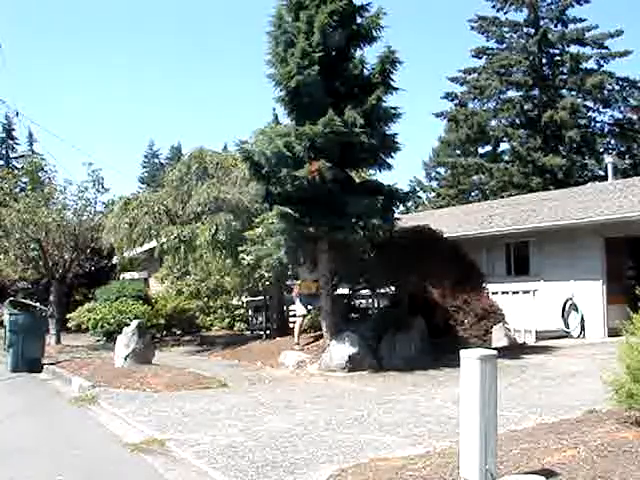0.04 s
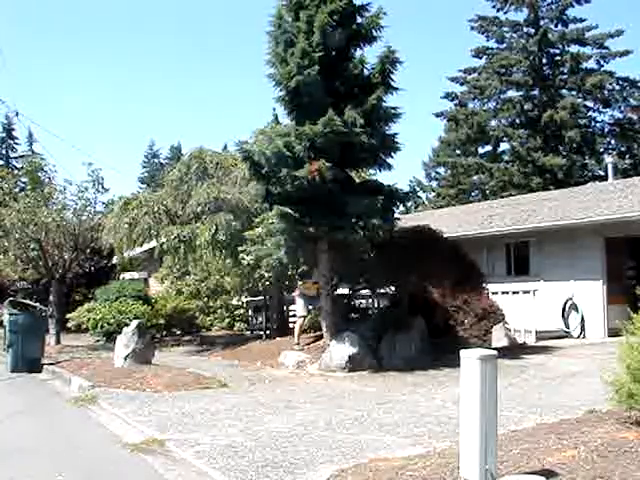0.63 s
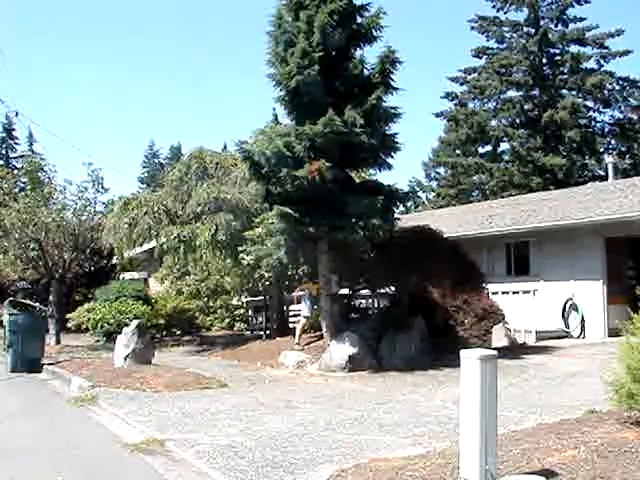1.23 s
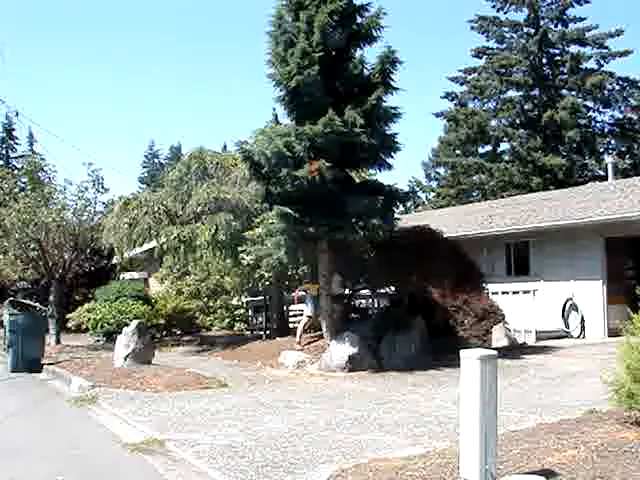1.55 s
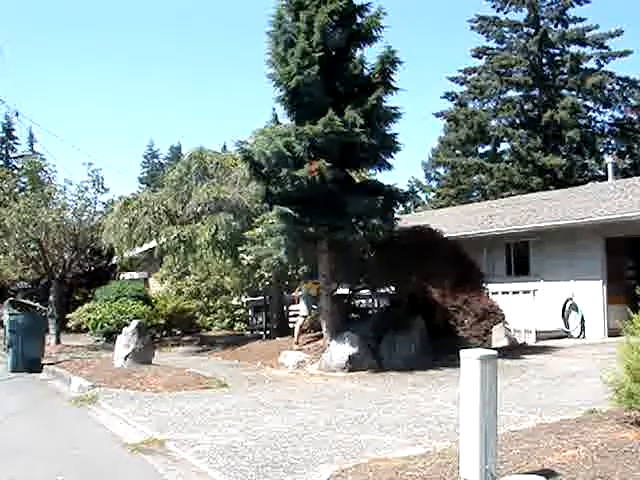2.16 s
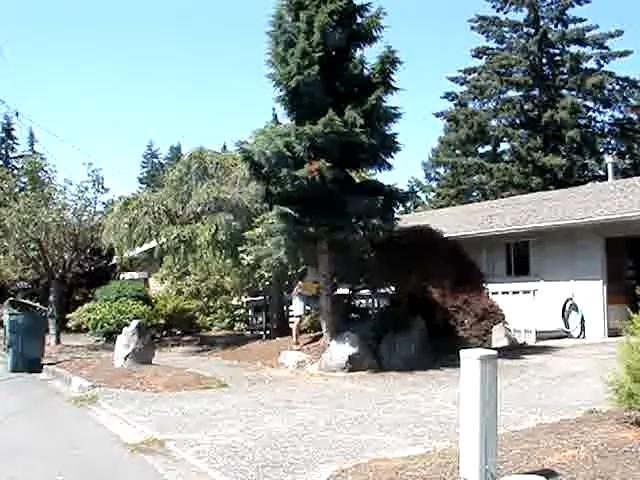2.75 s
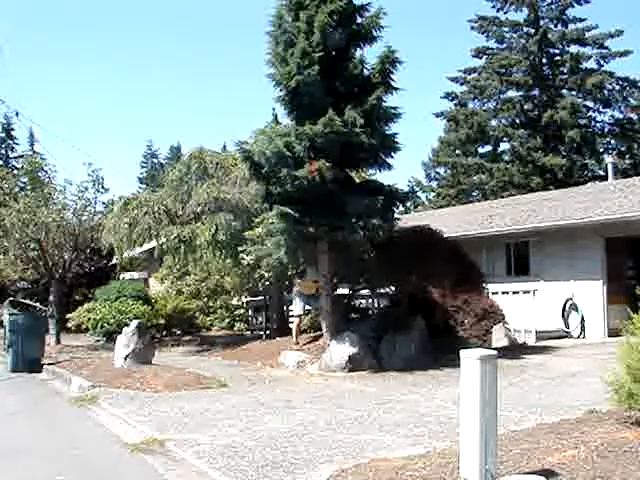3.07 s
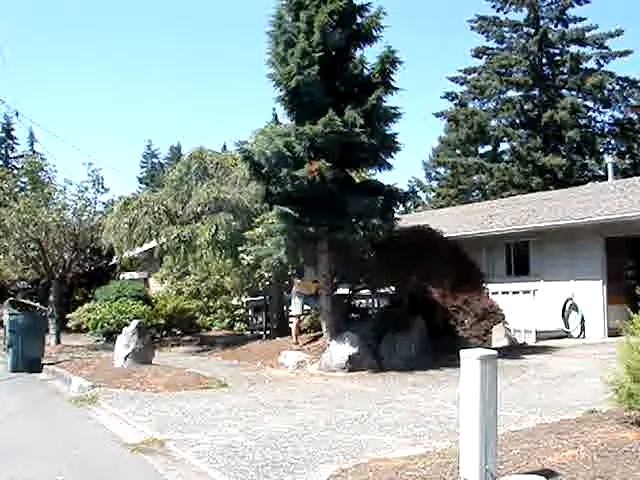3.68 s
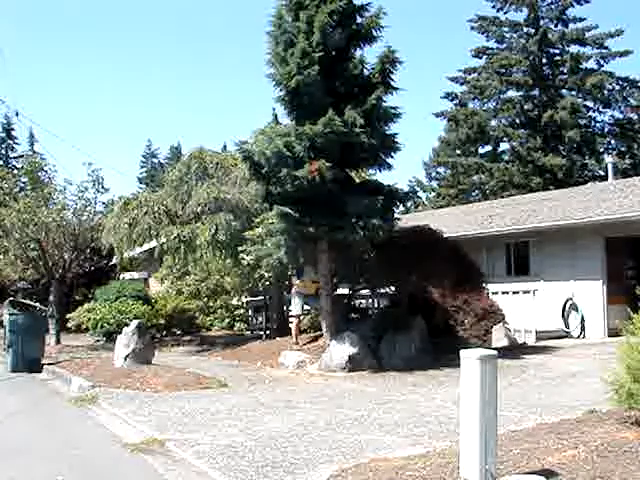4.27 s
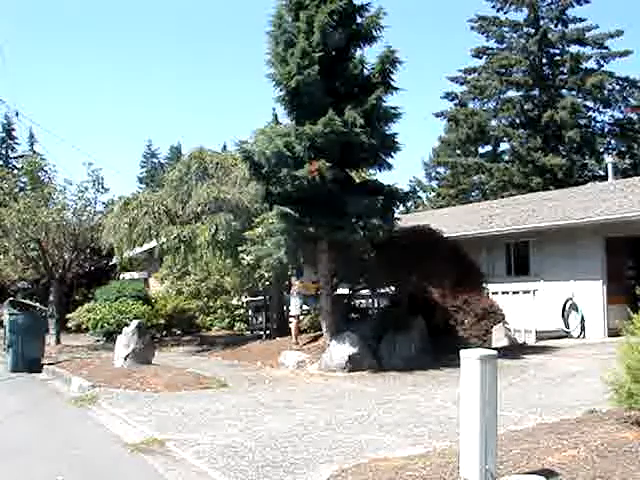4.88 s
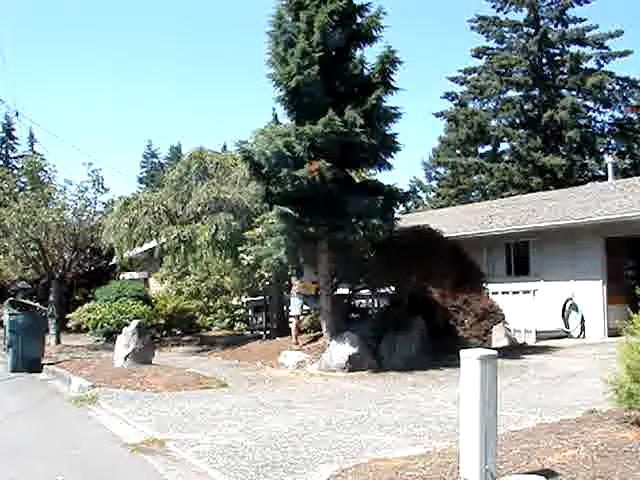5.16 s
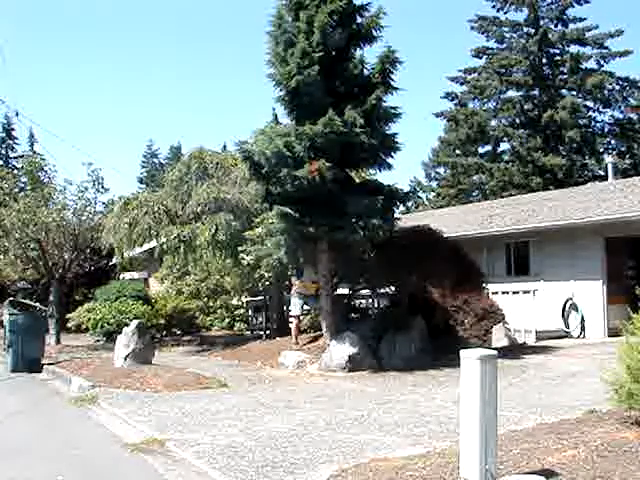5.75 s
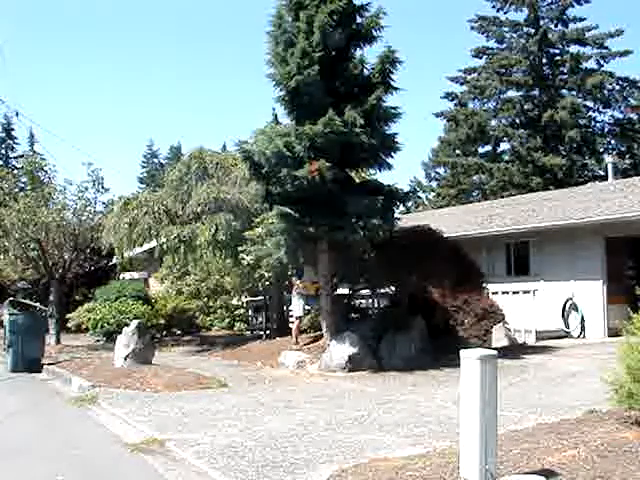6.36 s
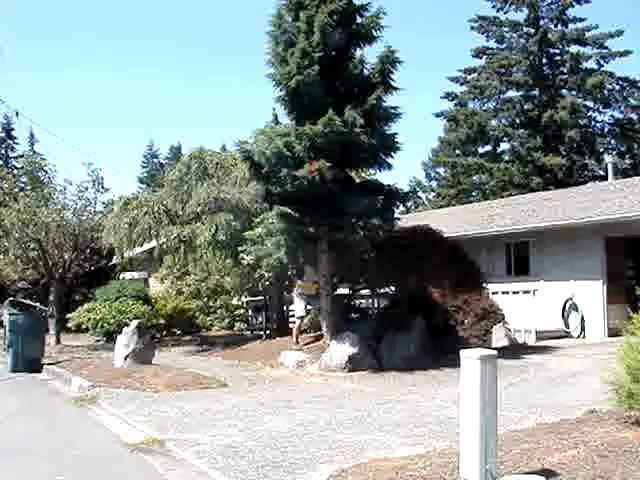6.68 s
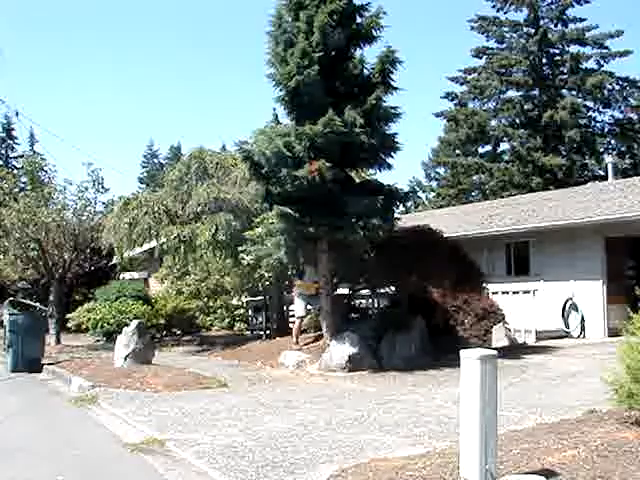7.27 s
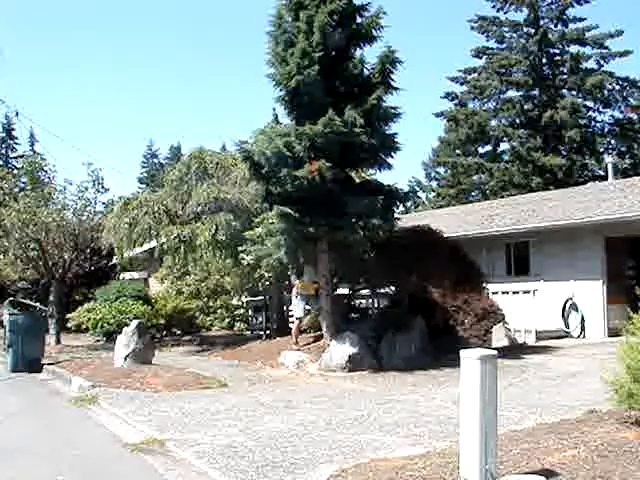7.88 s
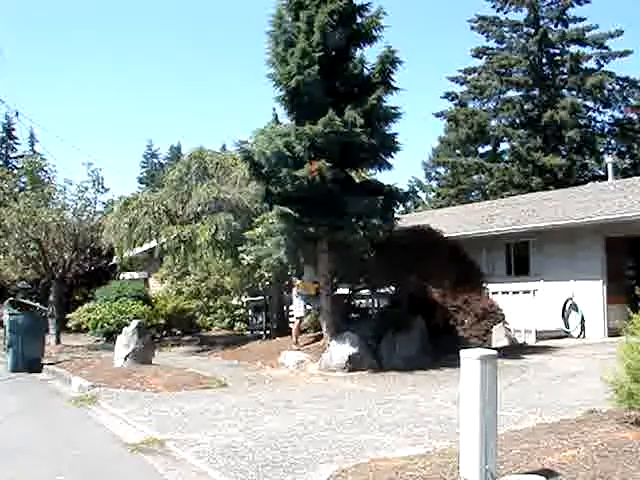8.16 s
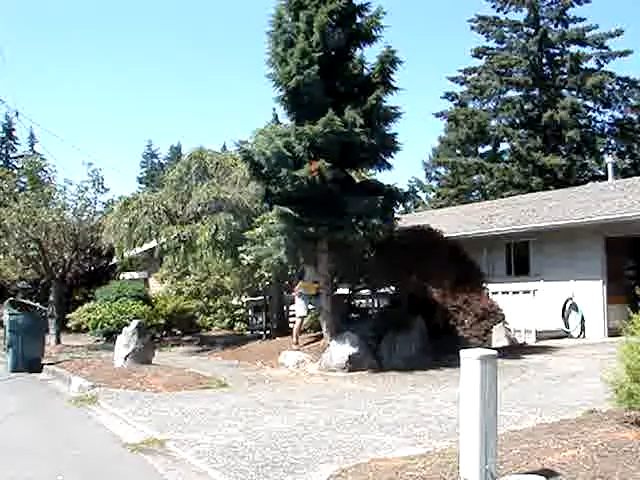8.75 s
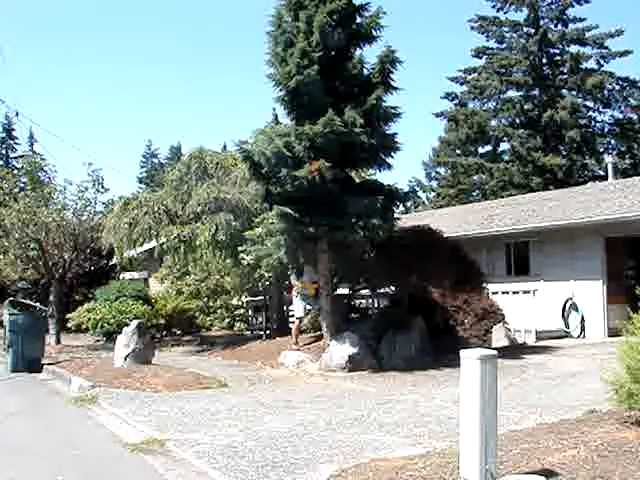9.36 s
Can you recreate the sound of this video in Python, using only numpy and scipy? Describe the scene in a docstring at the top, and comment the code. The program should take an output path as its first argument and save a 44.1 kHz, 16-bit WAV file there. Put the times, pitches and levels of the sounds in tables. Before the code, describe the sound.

Outdoors among houses and trees, a songbird whistles about once a second and a crow gives two hoarse caws over steady, far traffic. A faint siren wail and a distant horn pass through. Then an electric chainsaw suddenly spins up and dominates to the end, with a high, wavering whine and a clattering, rasping chain. The yard adds a light echo, and soft thumps bump the microphone.

```python
"""Soft traffic washes over a suburban yard. A small bird repeats a rising whistle, a crow caws twice,
twigs tick, and a far siren, horn and engine hums ride on the wash. Then an electric chainsaw starts:
its motor whines and sags under load, the chain clatters on the bar and rasps in the wood.
House and trees throw back the saw and the birds; faint gusts and low thumps touch the microphone."""
import sys
import numpy as np
from scipy import signal
from scipy.fft import rfft, irfft, next_fast_len
from scipy.io import wavfile
from scipy.ndimage import uniform_filter1d

SR = 44100
rng = np.random.default_rng(int(sys.argv[2]) if len(sys.argv) > 2 else 0)


def to_wav(s):
    """Save 16-bit WAV."""
    ch = np.atleast_2d(s).T  # columns
    pcm = np.round(np.clip(ch, -1, 1) * 32767)  # PCM
    wavfile.write(sys.argv[1], SR, pcm.astype(np.int16))


N = 415422
TIME = np.arange(N) / SR
FFT_SIZE = 2 * next_fast_len(N // 2 + 1)
FREQS = np.fft.rfftfreq(FFT_SIZE, 1 / SR)

# tone colour of the traffic: frequency_hz, gain_db
TRAFFIC_COLOUR = [(25, -22), (45, -12), (75, -2), (152, -5.5), (300, -2), (365, -2.5), (482, -5.5),
                  (780, -6.5), (900, -8), (1280, -13), (1730, -17), (3000, -25.5), (7040, -32.5),
                  (10000, -36.5)]
# gusts on the microphone: centre_s, half_width_s, level_db
GUSTS = [(1.25, 0.22, -59), (2.15, .3, -65)]
# low thumps on the microphone: centre_s, level_db
THUMPS = [(6.556, -29.5), (6.622, -37), (6.653, -28), (6.69, -34), (6.717, -25), (6.735, -33), (6.845, -30),
          (7.606, -30.5), (7.792, -34), (7.853, -34), (7.888, -36), (7.96, -38), (8.56, -37)]
# hum of a far engine: time_s, pitch_hz, level_db
ENGINE_HUM = [(0, 300.7, -58), (1.05, 299, -60), (1.38, 323.4, -55), (1.7, 325.7, -58), (3.45, 334, -62.5),
              (3.7, 347.6, -50), (4.2, 356, -56.5), (5.3, 367, -54), (5.9, 367, -56)]
# deeper hum of a second engine: time_s, pitch_hz, level_db
LOW_ENGINE_HUM = [(4.35, 197, -64), (4.55, 211.3, -53), (4.8, 223.6, -55), (4.95, 215, -68),
                  (5.4, 200.6, -56), (5.9, 232.4, -57)]
# one slow siren wail: time_s, pitch_hz, level_db
SIREN_WAIL = [(2.8, 1593, -63), (3.85, 1030, -62.5), (4.05, 964, -51), (4.2, 898, -60), (4.55, 778, -54),
              (4.85, 939, -63), (5.15, 1153, -62), (5.45, 1317, -61), (5.67, 1437, -60), (5.85, 1500, -72)]
# tones of the far horn: pitch_hz, base_level_db
HORN_CHORD = [(619, -54), (711, -55), (787, -53.5), (824, -55), (991, -57.5), (1446, -65.5)]
# the horn's swell: time_s, gain_db
HORN_SWELL = [(4.38, -24), (4.5, -2), (4.8, -1.5), (5.02, 3.5), (5.25, -3.5), (5.55, -0.5), (5.75, -9)]
# ticks and twig snaps: start_s, level_db, band_hz, decay_s
TICKS = [(.16, -49, 2500, .004), (2.196, -49, 5000, 0.0056), (2.511, -44.5, 1490, .005),
         (2.62, -55, 3504, 0.0046), (2.926, -42, 9000, 0.0043), (4.65, -51, 6010, 0.0037)]
# contour of one whistle: length_fraction, pitch_hz, gain_db
WHISTLE_CONTOUR = [(0, 3620, -15), (.04, 3560, -10), (.23, 3320, -8.5), (.45, 3420, -7.5),
                   (.62, 3580, -4.5), (.76, 3970, -4), (.86, 4270, 1), (.94, 4110, -2.5), (.975, 4076, -2),
                   (1, 4175, -25)]
# the bird's whistles: start_s, length_s, pitch_ratio, level_db, flick_amount
WHISTLES = [(-.18, .22, 0.97, -49.5, 0), (0.248, 0.22, 0.99, -45, 0.04), (1.047, 0.21, 1, -50, .1),
            (2.787, 0.2, 0.99, -47.5, 0), (3.633, .214, 1.003, -43.5, 0), (4.737, .218, 0.99, -47.5, 0.85),
            (5.558, 0.21, .97, -47.5, 1)]
# resonances of the crow's throat: frequency_hz, gain_db
CROW_THROAT = [(300, -34), (1100, -7), (1370, -32), (1490, 5), (1750, 3.5), (2060, 4), (2230, -8),
               (2750, -21), (3050, -15), (3400, -26.5), (4000, -10), (4400, -10.5), (4700, -31),
               (5050, -12.5), (6000, -25), (9000, -36)]
# caws: start_s, length_s, top_pitch_hz, level_db, swell_db, midway_treble_db, beak_shift_ratio
CAWS = [(0.352, .35, 296.7, -47.5, 5.5, 1, 0.95), (1.599, .345, 283, -39, -1.5, 3, 0.96)]
# motor speed, sagging twice as the chain is pressed into the wood: time_s, whine_hz
MOTOR_SPEED = [(5.88, 999), (5.95, 2098), (6.02, 2552), (6.08, 2988), (6.24, 3490), (6.41, 3612),
               (6.62, 3475), (6.79, 3228), (7.03, 3046), (7.3, 3133), (7.65, 3416), (7.79, 3633),
               (7.89, 3713), (8.04, 3130), (8.28, 2814), (8.56, 2745), (8.68, 2615), (8.78, 2798),
               (8.84, 2987), (8.97, 3098), (9.13, 3317), (9.28, 3378), (9.42, 3540)]
# the housing favours some pitches of the whine: whine_hz, gain_db
WHINE_COLOUR = [(1000, -21), (2100, 2), (2500, 11.5), (2620, 0.5), (2740, 4), (2900, -3), (3060, 1.5),
                (3200, -3), (3400, 6.5), (3500, -1.5), (3700, 2.5)]
# rough lines of the rotor: shaft_multiple, gain_db, width_hz
ROTOR_LINES = [(1, -27.5, 27), (3.5, -12, 60), (4.5, -16.5, 60), (7.5, -15.5, 120), (10.1, -8, 65),
               (11.067, -6.5, 26), (12.88, -6.5, 70), (15.04, -15.5, 60), (23.9, -15.5, 400),
               (35.7, -19, 270)]
# the housing's lift on a passing rotor line: frequency_hz, gain_db
ROTOR_COLOUR = [(230, -5), (290, 4.5), (600, -2), (2500, 0), (2900, -2.5), (3150, -8), (3420, 11.5),
                (3700, -5.5), (4900, 6.5), (5250, 7.5), (5550, -3), (5850, 10), (6250, 6), (6550, -8),
                (7700, -7), (8350, 4), (9000, -6)]
# clatter bands that follow the speed: whine_multiple, width_hz, gain_db
CLATTER_BANDS = [(1.0, 140, -12), (1.0, 750, 0), (2.0, 1100, -10.5)]
# tone colour of the cutters' rasp: frequency_hz, gain_db
RASP_COLOUR = [(60, -41), (180, -25.5), (290, -16), (430, -5), (700, 0), (1150, 5), (1600, -3.5),
               (2600, -0.5), (3500, 4), (4100, -1), (6200, -4), (7200, -11.5), (10000, -19)]
# shared level of rasp, clatter, rotor and housing; rises at spin-up, then nearly steady: time_s, gain_db
CUTTING_FADER = [(5.88, -43), (6.0, -31.5), (6.45, -28.5), (6.65, -28.5), (7.0, -30), (7.85, -29.5),
                 (8.02, -31), (8.62, -30.5), (8.85, -31), (9.42, -31)]
# resonances of the housing: frequency_hz, width_hz, gain_db
HOUSING_MODES = [(1982, 255, 0), (2220, 270, -2.5), (3355, 210, 3), (5980, 320, -15)]
# resonances of the bar: frequency_hz, width_hz, gain_db
BAR_MODES = [(301, 49, -9.5), (941.5, 64, 2.5), (878, 62, -3), (1185, 74, -12)]
# the chain slaps the bar: centre_s, boost_db
CHAIN_SLAPS = [(6.03, 8.5), (6.65, 6), (6.79, 3.5), (7.28, 4.5), (7.77, 3.5), (9.26, 2.5)]

SAW_ON_S, ARMATURE_SLOTS, CRUISE_WHINE_HZ = 5.878, 12, 3420


def undb(db):
    """Decibels to gain."""
    return 10 ** (np.asarray(db) / 20)


def unit(x):
    """Scale to rms 1."""
    return x / np.sqrt(np.mean(np.abs(x) ** 2))


def curves(rows):
    """Each column of a table, joined by straight lines in time."""
    times, *columns = np.transpose(rows)
    return [np.interp(TIME, times, column) for column in columns]


def during(rows):
    """1 while a table lasts, else 0."""
    return (TIME >= rows[0][0]) & (TIME <= rows[-1][0])


def swell(centre_s, half_width_s):
    """A bell-shaped bump of height 1."""
    return np.exp(-((TIME - centre_s) / half_width_s) ** 2)


def colour(points, hz):
    """Gain of an EQ curve at the given frequencies."""
    points_hz, db = np.transpose(points)
    return undb(np.interp(np.log(hz + 1), np.log(points_hz), db))


def ring(modes):
    """Frequency response of a set of resonances."""
    return sum(undb(db) * 1j * FREQS * width / (hz ** 2 - FREQS ** 2 + 1j * FREQS * width)
               for hz, width, db in modes)


def shape(x, response):
    """Filter by a frequency response; rms 1."""
    return unit(irfft(rfft(x, FFT_SIZE) * response)[:N])


def noise():
    """White noise."""
    return rng.standard_normal(N)


def walk(rate):
    """Random drift through rate points a second; spread 1."""
    knots = rng.standard_normal(N // 32)
    return np.sqrt(3 / 2) * np.interp(TIME * rate, np.arange(len(knots)), knots)


def blurred(phase, width_hz):
    """A tone smeared into a band by drifting level and phase."""
    return walk(width_hz) * np.cos(phase) + walk(width_hz) * np.sin(phase)


def phase_of(hz):
    """Running phase of a moving pitch."""
    return 2 * np.pi * np.cumsum(hz) / SR


def yard_reverb(x, wet_db, t60_s):
    """Direct sound plus duller, scattered returns from house and trees."""
    t = TIME[:SR]
    tail = rng.standard_normal(SR) * np.exp(-np.log(1000) * t / t60_s) * np.clip(t / 0.02, 0, 1)
    tail = signal.sosfilt(signal.butter(1, 4500, fs=SR, output="sos"), tail)
    return x + undb(wet_db) * signal.fftconvolve(x, tail / np.linalg.norm(tail))[:N]


def traffic():
    """The town's wash: rumble and tyre noise waver separately and slowly grow over a steady hiss."""
    start_db, rise_db_per_s, hiss_db = -47.5, 0.31, -45
    wash = shape(noise(), colour(TRAFFIC_COLOUR, FREQS))
    lows, body = (signal.sosfiltfilt(signal.butter(2, hz, fs=SR, output="sos"), wash)
                  for hz in (200, 2500))
    rumble = lows * undb(2.1 * walk(11))
    tyres = (body - lows) * undb(0.66 * walk(11))
    return undb(start_db + rise_db_per_s * TIME) * (rumble + tyres) + undb(hiss_db) * (wash - body)


def breeze():
    """Dying air and two faint gusts rumble on the microphone."""
    air_db, fall_db_per_s = -73.5, 1.5
    air = undb(air_db - fall_db_per_s * TIME)
    gusts = sum(undb(db) * swell(centre_s, half_s) for centre_s, half_s, db in GUSTS)
    return (air + gusts) * shape(noise(), ring([(38, 30, 0)]) ** 2)


def thumps():
    """Soft pushes of pressure on the microphone, without their steady part."""
    pushes = sum(undb(db) * swell(centre_s, half_width_s=0.0024) for centre_s, db in THUMPS)
    return signal.sosfilt(signal.butter(1, 14, "high", fs=SR, output="sos"), pushes)


def far_vehicle(glide):
    """An engine hum or siren arrives blurred by many paths."""
    hz, db = curves(glide)
    return undb(db) * during(glide) * blurred(phase_of(hz), width_hz=35)


def far_horn():
    """A horn holds its chord and slowly fades in and out, each tone wavering in level."""
    swell_db, = curves(HORN_SWELL)
    chord = sum(undb(db + 2.1 * walk(9)) * np.sqrt(2) * np.sin(2 * np.pi * hz * TIME)
                for hz, db in HORN_CHORD)
    return undb(swell_db - 2.0) * during(HORN_SWELL) * chord


def twig_ticks():
    """Brief dry cracks of noise, each with its own brightness."""
    out = np.zeros(N)
    t = TIME[:SR // 10]
    for start_s, db, hz, decay_s in TICKS:
        band = signal.butter(1, [hz / 2, min(hz * 1.4, SR / 3)], "band", fs=SR, output="sos")
        crack = unit(signal.sosfilt(band, rng.standard_normal(len(t))))
        start = int(start_s * SR)
        out[start:start + len(t)] += undb(db) * crack * np.exp(-t / decay_s)
    return out


def songbird():
    """A nearly pure whistle dips, climbs and ends on a buzzy hook; some open with a loud upward flick."""
    fraction, contour_hz, contour_db = np.transpose(WHISTLE_CONTOUR)
    hz, envelope, buzz = np.zeros((3, N))
    for start_s, length_s, pitch_ratio, db, flick_amount in WHISTLES:
        on = (TIME >= start_s) & (TIME < start_s + length_s)
        progress = (TIME[on] - start_s) / length_s
        flick = flick_amount * np.exp(-((progress - .09) / .06) ** 2)
        hz[on] = pitch_ratio * np.interp(progress, fraction, contour_hz) + 190 * flick
        envelope[on] = undb(db + np.interp(progress, fraction, contour_db) + 8.4 * flick)
        buzz[on] = progress ** 4
    phase = phase_of(hz * (1 + 0.0061 * walk(30) + 0.017 * buzz * walk(600)))
    tone = np.sqrt(2) * (np.sin(phase) + undb(-27) * np.sin(2 * phase))
    return yard_reverb(tone * envelope * undb(1.04 * walk(80)), wet_db=-16.5, t60_s=0.77)


def crow():
    """Jittery pulses through a nasal throat: brightest midway, hoarse as the pitch falls at the end."""
    scoop_depth, scoop_s, end_drop = .08, .04, .18
    attack_s, release_s, release_db = 0.033, .06, -18
    out = np.zeros(N)
    for start_s, length_s, top_hz, db, swell_db, treble_db, beak_shift in CAWS:
        on = (TIME >= start_s) & (TIME < start_s + length_s)
        t = TIME - start_s
        progress = np.clip(t / length_s, 0, 1)
        hz = top_hz * (1 - scoop_depth * np.exp(-t[on] / scoop_s) - end_drop * progress[on] ** 4)
        closing = np.clip((t - length_s) / release_s + 1, 0, 1)
        envelope = np.clip(t / attack_s, 0, 1) * undb(db + swell_db * progress + release_db * closing)
        hoarse = np.clip((270 - hz) / 40, 0, 1)
        phase = phase_of(hz * (1 + (.006 + .006 * hoarse) * walk(300)[on]))
        pulses = unit(sum(np.cos(k * phase) for k in range(1, 32)))
        breath = (.1 + .08 * hoarse) * noise()[on] * (1 + np.cos(phase))
        voice = np.zeros(N)
        voice[on] = pulses + breath
        caw = shape(voice, colour(CROW_THROAT, FREQS / beak_shift)) * np.sqrt(np.mean(on)) * envelope
        treble = signal.sosfiltfilt(signal.butter(4, 2800, "high", fs=SR, output="sos"), caw)
        out += caw + treble * (undb(treble_db - 6.9 * np.cos(np.pi * progress) ** 2) - 1)
    return yard_reverb(out, wet_db=-9, t60_s=0.79)


def braking(hz, window, full_hz_per_s):
    """How fast the motor slows over window samples: 1 in a full bite, negative when running up."""
    return np.clip(-uniform_filter1d(np.gradient(hz), size=window) * SR / full_hz_per_s, -1, 1)


def motor_whine(hz, slot_phase):
    """The slots' tone swells in the housing's resonances and under braking; it thins running free."""
    bite_db, free_db = 6.5, -7.5
    load = braking(hz, window=SR // 16, full_hz_per_s=4100)
    load_db = bite_db * np.maximum(load, 0) ** 2 + free_db * np.maximum(-load, 0)
    housing_db = np.interp(hz, *np.transpose(WHINE_COLOUR))
    flicker_db = 0.6 * walk(9) + 1.3 * walk(60)
    return np.sqrt(2) * np.sin(slot_phase) * undb(-28 + housing_db + load_db + flicker_db)


def rotor_growl(hz, slot_phase):
    """An uneven rotor adds rough lines that swell as they sweep through the housing's resonances."""
    lines = np.zeros(N)
    for multiple, db, width_hz in ROTOR_LINES:
        lift = colour(ROTOR_COLOUR, multiple * hz / ARMATURE_SLOTS)
        nearest_half = np.round(2 * multiple) / 2
        lines += undb(db) * lift * blurred(nearest_half * slot_phase / ARMATURE_SLOTS, width_hz)
    # as the chain bites, the motor slows and the whine's octave flares
    bite = np.maximum(braking(hz, window=SR // 8, full_hz_per_s=1100), 0)
    octave = colour(ROTOR_COLOUR, 2 * hz) * blurred(2 * slot_phase, width_hz=270)
    return lines + undb(-11.5) * bite * octave


def link_impacts(shaft_phase, scatter_db, throb):
    """Chain links strike with random force, harder once per shaft turn and in uneven bites."""
    hits_per_s = 2500
    hits = noise() * (rng.random(N) < hits_per_s / SR)
    return (unit(hits) + 0.7 * noise()) * (1 + throb * np.cos(shaft_phase)) * undb(scatter_db * walk(95))


def bar_rattle(hz, shaft_phase):
    """The chain rattles the bar harder when slack or fast, throbs once a lap and now and then slaps."""
    cruise_db, db_per_hz, floor_db, turns_per_lap = -28, 0.0107, -34.5, 27.1
    # the thin bar radiates little bass, and its dull knocks little treble
    response = ring(BAR_MODES) * FREQS / np.hypot(FREQS, 700) / np.hypot(1, (FREQS / 1600) ** 3)
    knocks = shape(link_impacts(shaft_phase, scatter_db=2.0, throb=0.21), response)
    speed_db = np.maximum(cruise_db + db_per_hz * (hz - CRUISE_WHINE_HZ), floor_db)
    slack_db = 2.5 * np.clip((6.85 - TIME) / .1, 0, 1)  # until the chain settles in the cut
    lap_db = -1.4 * np.cos(shaft_phase / turns_per_lap)
    slap_db = sum(db * swell(centre_s, half_width_s=.028) for centre_s, db in CHAIN_SLAPS)
    return knocks * undb(speed_db + slack_db + lap_db + slap_db)


def chainsaw():
    """Armature slots whine at twelve times the shaft rate; the chain rasps and rings bar and housing."""
    hz, = curves(MOTOR_SPEED)
    cutting_db, = curves(CUTTING_FADER)
    gear_chatter = np.clip((SAW_ON_S + .25 - TIME) / 0.155, 0, 1)  # only during spin-up
    slot_phase = phase_of(hz * (1 + 0.001516 * walk(60) + .06 * gear_chatter * walk(400)))
    shaft_phase = slot_phase / ARMATURE_SLOTS
    whine = motor_whine(hz, slot_phase)
    growl = rotor_growl(hz, slot_phase)
    clatter = sum(undb(db) * blurred(k * slot_phase, width_hz) for k, width_hz, db in CLATTER_BANDS)
    rasp = shape(link_impacts(shaft_phase, scatter_db=0.5, throb=.06), colour(RASP_COLOUR, FREQS))
    housing = shape(link_impacts(shaft_phase, scatter_db=1.0, throb=0.17), ring(HOUSING_MODES))
    cutting = (growl + clatter + undb(3.5) * rasp + undb(1.37) * housing) * undb(cutting_db)
    saw = whine + cutting + bar_rattle(hz, shaft_phase)
    switch_on = np.clip((TIME - SAW_ON_S) / 0.0022, 0, 1)
    return yard_reverb(saw * switch_on, wet_db=-11, t60_s=0.9)


def scene():
    """The mono mix: saw, birds and small knocks over a bed of town and air."""
    foreground = chainsaw() + thumps() + songbird() + crow() + twig_ticks()
    vehicles = far_horn() + sum(far_vehicle(glide) for glide in (SIREN_WAIL, ENGINE_HUM, LOW_ENGINE_HUM))
    return (foreground + vehicles + traffic() + breeze())[None]


def record(dry):
    """A steep treble cut, and a quick fade to end without a click."""
    top_hz, fade_s = 9980, .004
    fade = np.clip((TIME[-1] - TIME) / fade_s, 0, 1) ** 2
    return signal.sosfilt(signal.ellip(12, .1, 80, top_hz, fs=SR, output="sos"), dry) * fade


dry = scene()
out = record(dry)
to_wav(out)
```